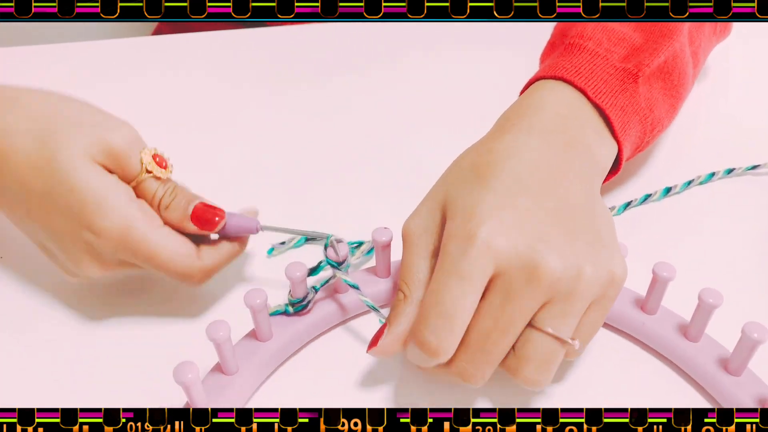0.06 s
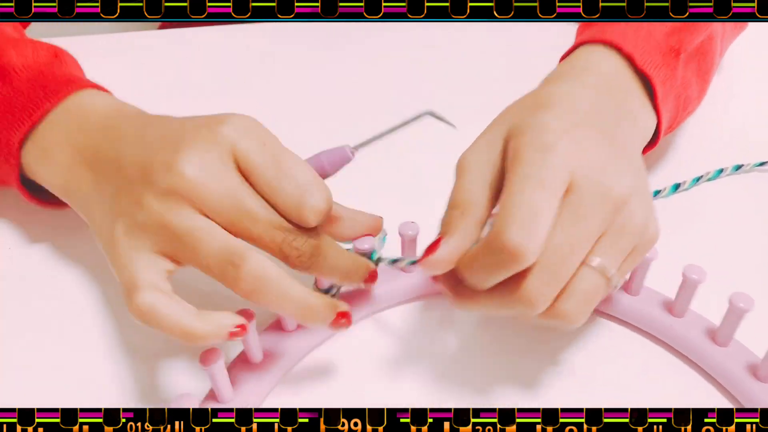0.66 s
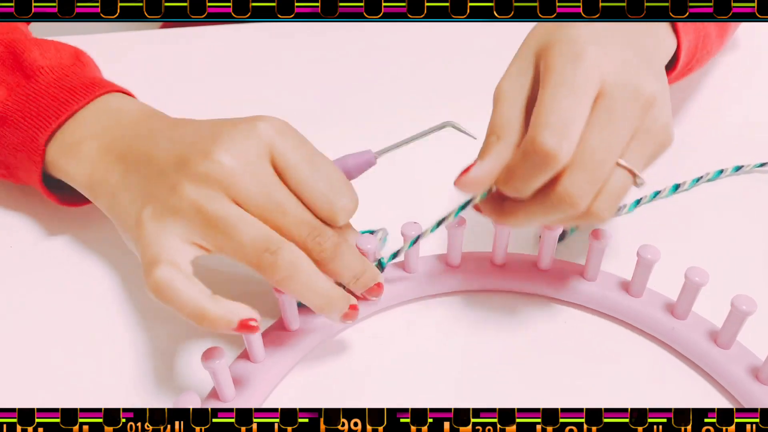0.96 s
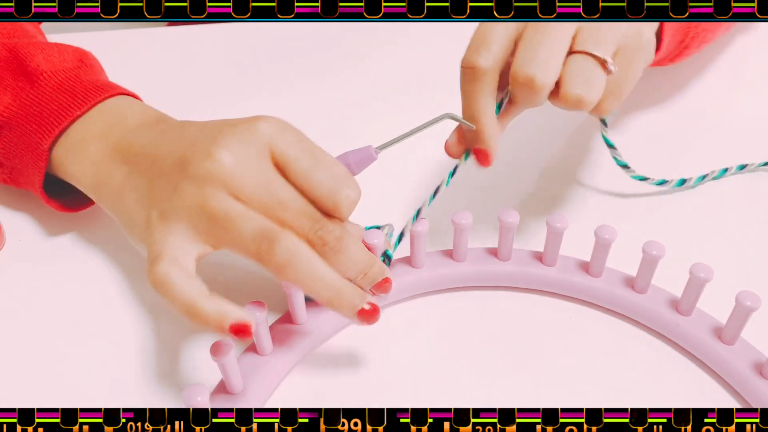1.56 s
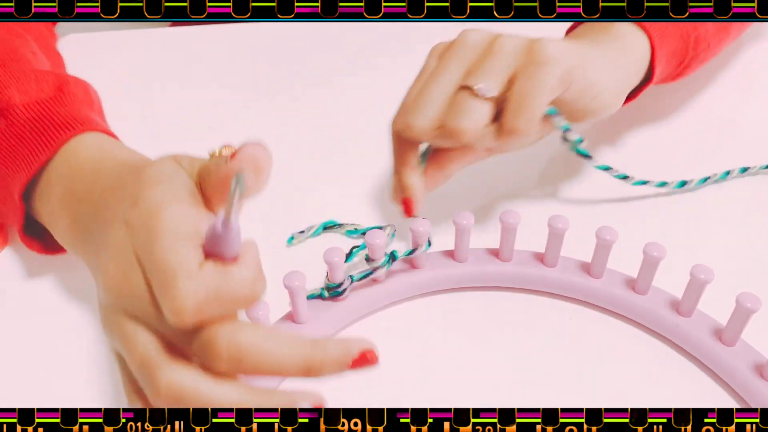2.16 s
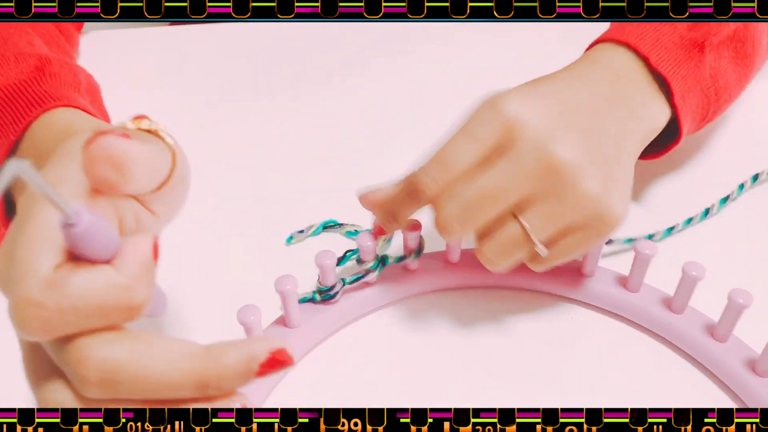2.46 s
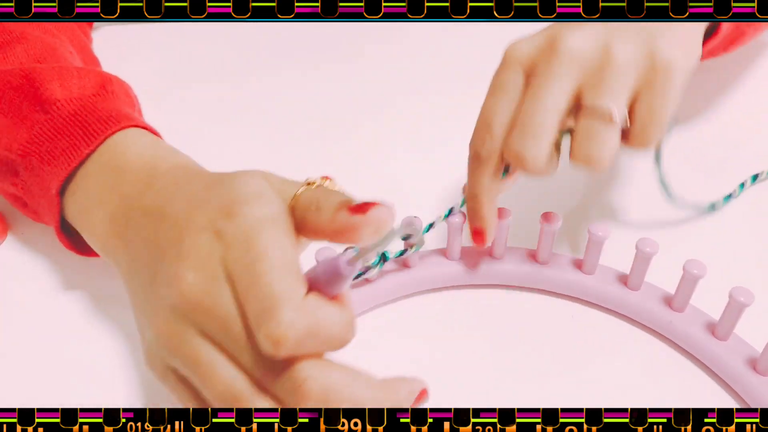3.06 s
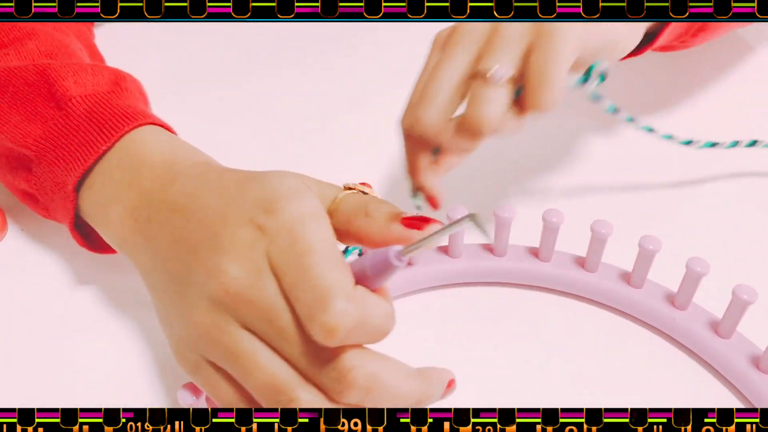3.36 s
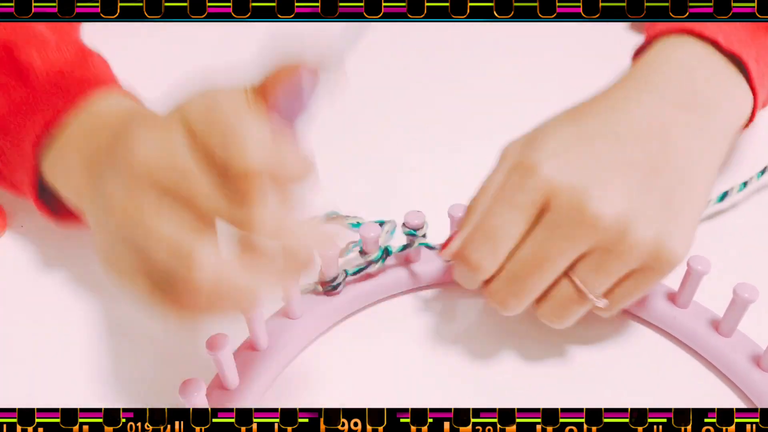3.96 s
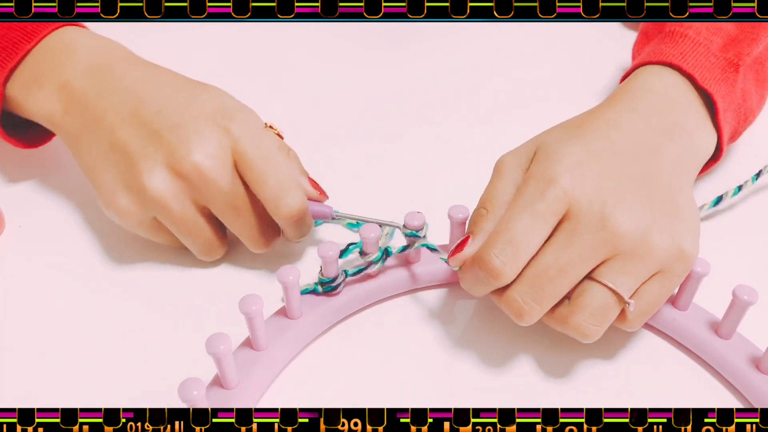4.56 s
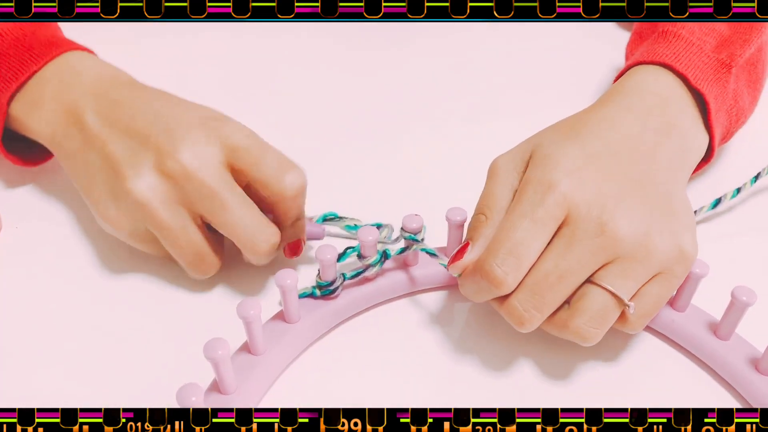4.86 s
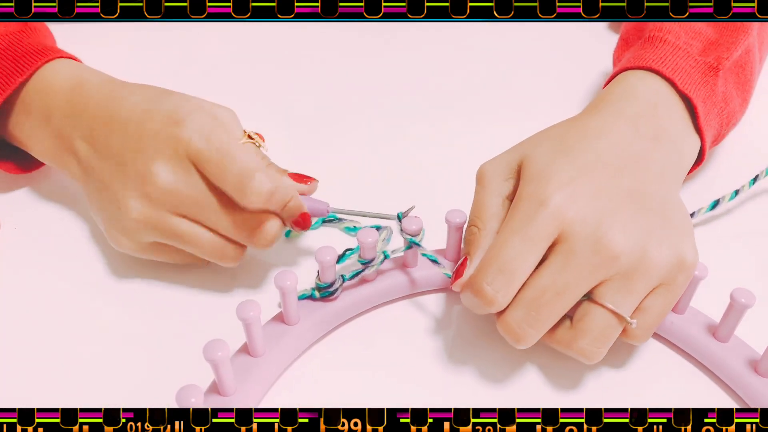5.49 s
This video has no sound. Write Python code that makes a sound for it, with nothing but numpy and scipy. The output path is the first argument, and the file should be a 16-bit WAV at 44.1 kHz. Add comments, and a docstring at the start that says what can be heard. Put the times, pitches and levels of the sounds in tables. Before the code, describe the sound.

Hollow plastic knocks on a tabletop as yarn is worked around a knitting loom with a hook, with soft rubbing in a quiet room.

```python
"""Hollow plastic knocks on a tabletop, heard from just above it in a small, quiet room.
Yarn is being wound round the pegs of a knitting loom, which rocks and sets loom, table and room ringing.
A metal hook ticks on the pegs and, near the end, sticks and slips over one in a short scrape.
With each move of the hands the loom rumbles dully, and fingers and yarn brush over the plastic."""
import sys
import numpy as np
from scipy import signal
from scipy.fft import rfft, irfft
from scipy.io import wavfile
from scipy.ndimage import uniform_filter1d

SR = 44100
rng = np.random.default_rng(int(sys.argv[2]) if len(sys.argv) > 2 else 0)


def store_wav(level_fs):
    """Save 16-bit WAV to argv[1]."""
    pcm = np.round(np.clip(np.atleast_2d(level_fs), -1, 1) * 32767)
    wavfile.write(sys.argv[1], SR, pcm.T.astype(np.int16))


N = 248283
TIME = np.arange(N) / SR
SIZE = 32768  # samples in the response to one blow
HZ = np.fft.rfftfreq(SIZE, 1 / SR)

# reverberation of the small room: f/Hz, t60/s
ROOM_DECAY = [(100, 1), (260, 0.27), (700, 0.4), (1800, 0.68), (5000, 0.077), (15000, 0.14)]
# moves of the hands: middle t/s, length/s, finger rub level/dB, level of the weight on the loom/dB
HAND_MOVES = [ (.2, 0.55, -63.5, -60.5), (0.568, 0.36, -62, -67), (0.841, 0.13, -62.5, -59.5),
              (2.085, 0.46, -70.5, -79), (2.427, 0.4, -63, -77), (3.113, 0.54, -76, -65),
              (3.548, 0.36, -68.5, -58), (3.771, .26, -73.5, -55), (4.3, 1, -70.5, -64.5),
              (4.719, 0.34, -78, -55), (5.062, 0.28, -64.5, -72), (5.312, 0.36, -64.5, -61),
              (5.568, 0.25, -68.5, -63.5)]


def amp(db):
    """Decibels to gain."""
    return 10 ** (np.asarray(db) / 20)


def unit_rms(x):
    """Scales to rms 1."""
    return x / np.sqrt(np.mean(x ** 2) + 1e-20)


def read(points, hz):
    """Reads rows of (f/Hz, value) on a log-frequency axis."""
    f, value = np.transpose(points)
    return np.interp(np.log(hz + 1), np.log(f), value)


def add(mix, start_s, sound):
    """Mixes a sound in from start_s on."""
    part = mix[max(round(start_s * SR), 0):][:len(sound)]
    part += sound[:len(part)]


def noise(colour_db):
    """Noise of rms 1 with a spectrum given as a function of frequency."""
    gain = amp(colour_db(np.fft.rfftfreq(N, 1 / SR)))
    return unit_rms(irfft(rfft(rng.standard_normal(N)) * gain, N))


def swell(start_s, rise_s, fade_s):
    """Gain over time: a straight rise, then an exponential fade."""
    age = TIME - start_s
    return np.clip(age / rise_s, 0, 1) * np.exp(-np.maximum(age - rise_s, 0) / fade_s)


def arch(middle_s, length_s):
    """Gain over one move of the hand: it speeds up and slows down again."""
    return np.maximum(1 - (2 * (TIME - middle_s) / length_s) ** 2, 0) ** 0.99


def grain(rough_db, samples=130):
    """Fibres catch and let go: a quick random flutter of level."""
    return amp(rough_db * unit_rms(uniform_filter1d(rng.standard_normal(N), samples)))


def causal(gain):
    """The minimum-phase spectrum with this gain."""
    cepstrum = irfft(np.log(np.maximum(gain, 1e-5)))
    cepstrum[1:SIZE // 2] *= 2
    cepstrum[SIZE // 2 + 1:] = 0
    return np.exp(rfft(cepstrum))


def ringing(modes):
    """Spectrum of dying modes, from rows of (f/Hz, height/dB, t60/s)."""
    return sum(amp(db) / (1 + 2j * np.pi * (HZ - hz) * t60 / np.log(1000)) for hz, db, t60 in modes)


def echoes(decay, build_s):
    """Spectrum of dense echoes that build up and die by rows of (f/Hz, t60/s), equal energy per band."""
    hz, t, bands = signal.stft(rng.standard_normal(SIZE), SR, nperseg=256)
    fade = 1000. ** (-t / read(decay, hz)[:, None]) * (1 - np.exp(-t / build_s))
    fade /= np.sqrt((fade ** 2).sum(1, keepdims=True) * t[1] * SR)
    return rfft(signal.istft(bands * fade, SR)[1][:SIZE])


def room_tone():
    """The room's air all round the microphone: a steady low murmur and faint hiss."""
    # spectrum of the quiet room: f/Hz, relative level/dB
    air_colour = [(15, -37), (25, -28), (45, -9.5), (70, -18), (100, -5.5), (120, -13), (146, -0.5),
                  (172, -10), (225, -7), (280, -12), (410, -20), (550, -17), (620, -21.5), (970, -22.5),
                  (1660, -28), (3830, -34), (10000, -43), (15500, -43.5)]
    return amp(-62) * noise(lambda hz: read(air_colour, hz))


def hand_rumble():
    """The weight of the hands moves the loom on the table with a dull, uneven rumble."""
    # spectrum of the shifting loom: f/Hz, relative level/dB
    rumble_colour = [(20, -11), (40, -14), (70, -11.5), (110, -3), (160, -3), (220, -0.5), (290, -9),
                     (430, -15.5), (900, -37), (4000, -60)]
    weight = sum(amp(db) * arch(middle_s, length_s) for middle_s, length_s, _, db in HAND_MOVES)
    return noise(lambda hz: read(rumble_colour, hz)) * weight * grain(rough_db=1.0, samples=900)


def finger_rub():
    """Skin rubs on plastic, louder as the hand moves faster."""
    # spectrum of skin on plastic: f/Hz, relative level/dB
    rub_colour = [(200, 6.5), (600, 2.5), (1100, 1), (1900, -1), (3000, -13), (6000, -18), (16000, -40)]
    speed = sum(amp(db) * arch(middle_s, length_s) for middle_s, length_s, db, _ in HAND_MOVES)
    return noise(lambda hz: read(rub_colour, hz)) * speed * grain(rough_db=2.0)


def yarn_hiss():
    """Yarn runs through the fingers and over pegs; each stroke swells and fades as a grainy hiss."""
    # pulls of the yarn: t/s, level/dB, fade time/s, lower edge of the hiss/Hz
    strokes = [ (.02, -70, 0.031, 4000), (.345, -74, .034, 9000), (.575, -77, 0.23, 7000),
               (.812, -69.5, 0.045, 4480), (1.135, -74.5, .03, 11000), (1.445, -74, 0.031, 10000),
               (1.939, -58.5, 0.076, 800), (3.85, -75.5, .19, 6000), (4.72, -73.5, 0.038, 9000),
               (5.22, -81, .12, 8000)]
    # spectrum of sliding yarn: f/Hz, relative level/dB
    yarn_colour = [(1500, 2), (4000, -1), (8500, -3), (11000, -9.5), (15500, -8)]
    out = np.zeros(N)
    for start_s, db, fade_s, edge_hz in strokes:
        hiss = noise(lambda hz: read(yarn_colour, hz) - 10 * np.log10(1 + (edge_hz / (hz + 1)) ** 6))
        out += amp(db) * swell(start_s, 0.27 * fade_s, fade_s) * hiss
    return out * grain(rough_db=1.5)


def hook_ticks(centre_hz=12600):
    """The tip of the metal hook meets a peg with a thin, very short tick."""
    # light touches on a peg: t/s, level/dB
    touches = [(.0162, -46.5), (0.288, -61), (.422, -65)]
    band = noise(lambda hz: -10 * np.log10(1 + np.log2((hz + 1) / centre_hz) ** 4))
    return band * sum(amp(db) * swell(start_s, rise_s=0.0012, fade_s=0.0018) for start_s, db in touches)


def blow_response(hard_hz, light_hz):
    """A blow crosses loom and table as bending waves, rebounds at the edges, rings them and the room."""
    # answer of loom and tabletop together to a hard blow: f/Hz, level/dB
    body_colour = [(30, -22), (60, 7), (92, 18), (200, 11), (290, 11.5), (480, 6), (750, 6.5), (1100, 4.5),
                   (1600, 2), (2700, -3), (3700, 1.5), (5500, -10), (16000, -42)]
    # modes of loom and table, plus one low, long boom of the room near 135 Hz:
    # f/Hz, height over that answer/dB, t60/s
    loom_and_room_modes = [(91, 1, 0.064), (134.9, 12.5, 0.91), (204.5, 11.5, 0.26), (236.3, 3, 0.46),
                           (350.8, 8.5, 0.18), (413, -2, 0.051), (436, -0.5, 0.083), (548.6, 8.5, 0.1),
                           (614.4, 7, 0.11), (756, -10, 0.22), (875, 6.5, 0.1), (986, 1, 0.52),
                           (1150, -3, 0.12), (1390, -8, 0.086), (1770, -19, 0.18), (2000, 1, 0.15),
                           (2510, -4.5, 0.021), (2880, 0, 0.025)]
    blow = 1 / np.sqrt((1 + (HZ / hard_hz) ** 6) * (1 + (light_hz / (HZ + 1)) ** 4))
    # bending waves are slower at low pitch, so every knock falls quickly from click to thud
    delay_s = 0.01705 / (1 + (HZ / 170) ** 1.276)
    spread = np.exp(-2j * np.pi * np.cumsum(delay_s) * HZ[1])
    rebounds = echoes([(150, 0.1553), (700, 0.093), (3000, 0.00614)], build_s=0.0017)
    rebounds *= amp(read([(100, -2), (600, 1), (3000, -9)], HZ))
    wave = causal(amp(read(body_colour, HZ)) * blow) * spread
    return wave * (amp(-4.5) + ringing(loom_and_room_modes) + rebounds)


def hook_scrape(slips_per_s=1100):
    """The hook drags yarn over a peg, sticking and slipping; every slip is a small blow on the loom."""
    # force of the drag: t/s, relative level/dB
    drag = [(4.66, -51), (4.701, -27), (4.711, -21.5), (4.726, -35.5), (4.744, -27), (4.763, -34),
            (4.778, -50)]
    # resonances of the hook pressed on the peg: f/Hz, height/dB, t60/s
    hook_modes = [(430, 10.5, 0.023), (860, 5.5, 0.009), (1220, 15, 0.023), (2600, -3, .006),
                  (3680, -1.5, 0.0017)]
    force = amp(np.interp(TIME, *np.transpose(drag), left=-np.inf, right=-np.inf))
    slips = (rng.random(N) < slips_per_s / SR) * rng.choice([-1, 1], N) * force
    # the pressing hand damps the loom, so the slips die quickly
    damping = np.exp(-np.arange(SIZE) / SR / 0.021)
    damped_blow = rfft(irfft(blow_response(hard_hz=4350, light_hz=252)) * damping)
    hook = amp(-18) + ringing(hook_modes)
    room = 1 + amp(-8.5) * echoes(ROOM_DECAY, build_s=0.0091)
    return amp(-9) * signal.oaconvolve(slips, irfft(damped_blow * hook * room))[:N]


def loom_knocks(spot_cycles=10):
    """Each blow reaches the microphone as a tiny contact tick, a thud of loom and table, then the room."""
    # blows on the loom: t/s, strength/dB, hardness as upper corner/Hz, lightness as lower corner/Hz,
    # resonance of the struck spot/Hz, its height/dB
    blows = [ (.018, -11, 1860, 216, 1650, 5), (0.0723, 1.5, 1980, 90, 237, 1),
             (0.2705, -23.5, 3000, 600, 810, -14), (0.4206, -17, 1750, 396, 328, 11.5),
             (0.439, -20.5, 129, 55, 70, -1), (.57, -6.5, 1690, 101, 437, 8.5),
             (.818, -27, 1100, 113, 204, 7.5), (.87, -24, 1000, 167, 280, 15),
             (2.358, -15, 3500, 348, 514, 4), (2.3655, -1, 3360, 80.4, 425, -0.5),
             (2.392, -2.5, 1430, 410, 560, -3), (2.8145, -21.5, 1530, 500, 844, -19),
             (2.846, -12.5, 537, 125, 306, 2.5), (3.6601, -11.5, 750, 189, 296, 10),
             (3.787, -32.5, 900, 500, 740, 3), (3.8355, -31.5, 785, 496, 675, 9.5),
             (4.013, -15.5, 131, 50, 79, -6.5), (4.3575, -20.5, 5040, 1270, 1210, 9.5),
             (4.3768, -18.5, 1210, 400, 430, 9.5), (4.6978, -31, 1600, 200, 550, 0),
             (4.7425, -22.5, 1420, 300, 940, 1), (5.576, -27.5, 540, 247, 415, 2.5)]
    out, t = np.zeros(N), np.arange(SIZE) / SR
    tick_colour = causal(amp(read([(300, 7), (1500, 7), (4200, -4.5), (8000, -16), (15000, -22)], HZ)))
    for start_s, db, hard_hz, light_hz, spot_hz, spot_db in blows:
        spot = 1 + ringing([(spot_hz, spot_db, spot_cycles / spot_hz)])
        thud = amp(db) * blow_response(hard_hz, light_hz) * spot
        snap = rng.standard_normal(SIZE) * np.exp(-t / 0.0016)
        # the tick grows with the strength of the blow and with each octave of hardness
        tick_db = -24 + 0.7 * db + 5.5 * np.log2(hard_hz / 1500)
        tick = amp(tick_db) * tick_colour * rfft(snap / np.linalg.norm(snap))
        room = 1 + amp(-10.5) * echoes(ROOM_DECAY, build_s=0.0081)
        add(out, start_s, irfft((thud + tick) * room))
    return out


def scene():
    """Everything at the loom, at one microphone just above the table."""
    contacts = loom_knocks() + hook_scrape() + hook_ticks()
    handling = finger_rub() + hand_rumble() + yarn_hiss()
    return (contacts + handling + room_tone())[None]


def record(dry):
    """The recorder passes sound up to 15.8 kHz."""
    lowpass = signal.firwin(511, 15800, window=("kaiser", 8), fs=SR)
    return signal.oaconvolve(dry, lowpass[None], "same")


dry = scene()
out = record(dry)
store_wav(out)
```